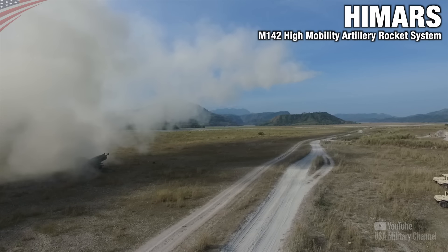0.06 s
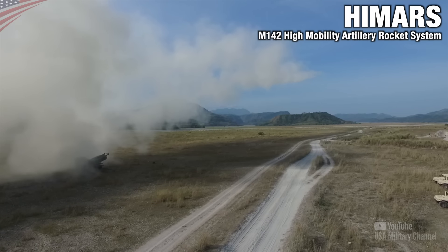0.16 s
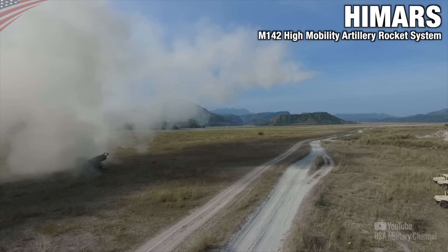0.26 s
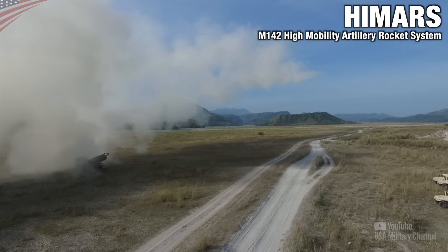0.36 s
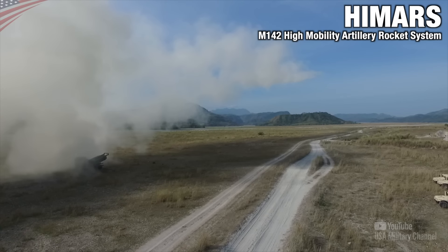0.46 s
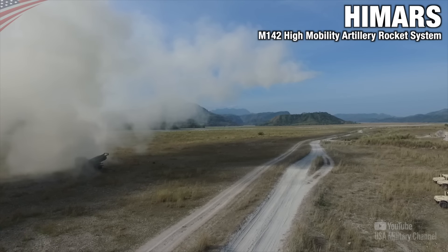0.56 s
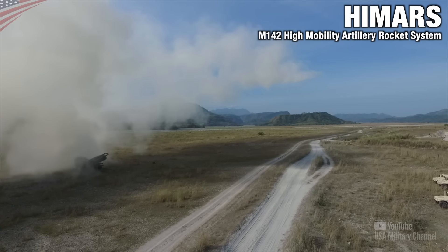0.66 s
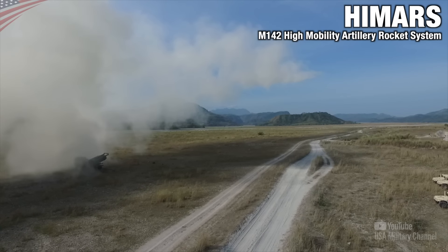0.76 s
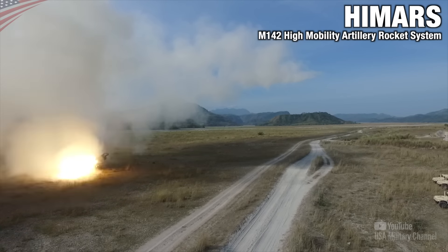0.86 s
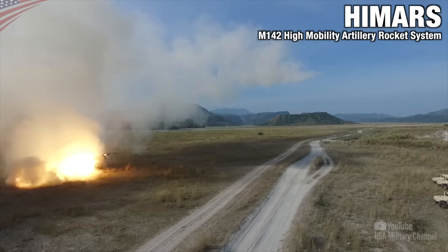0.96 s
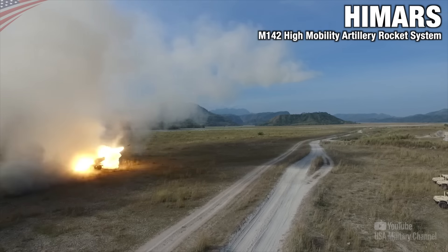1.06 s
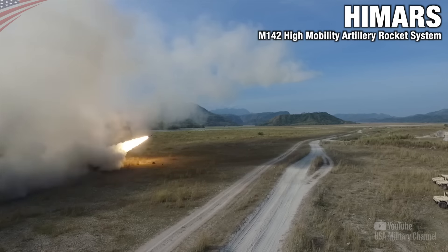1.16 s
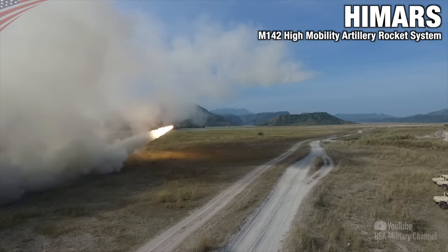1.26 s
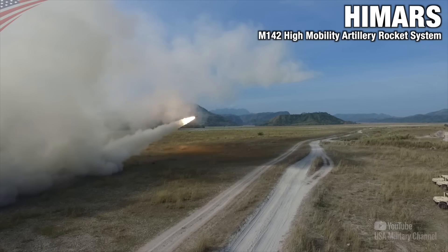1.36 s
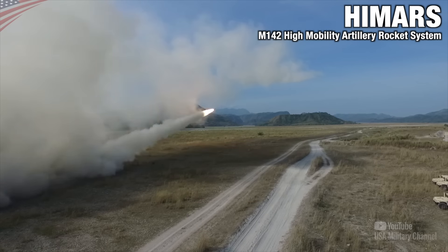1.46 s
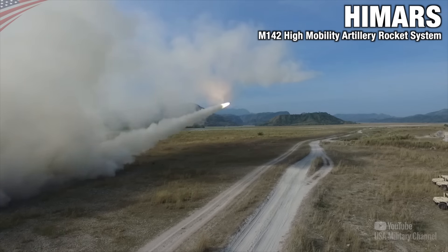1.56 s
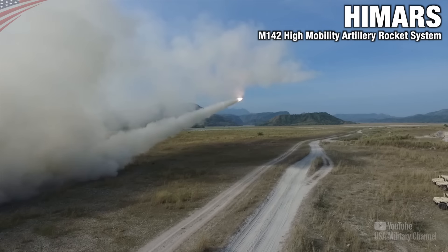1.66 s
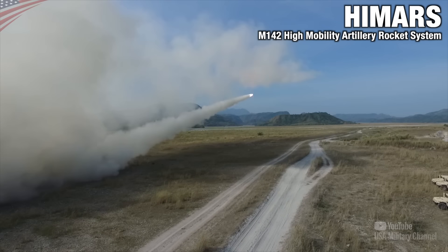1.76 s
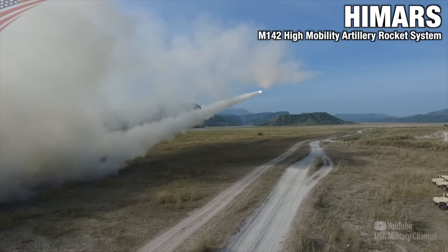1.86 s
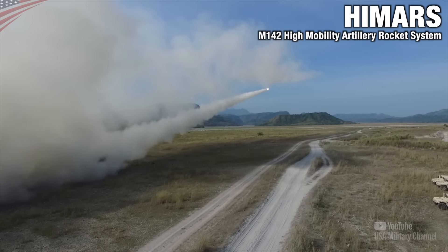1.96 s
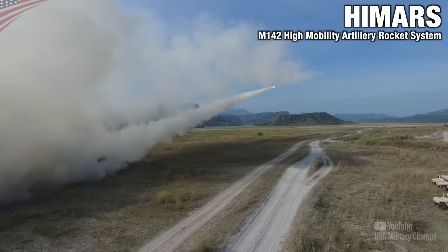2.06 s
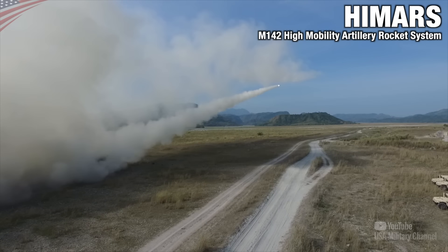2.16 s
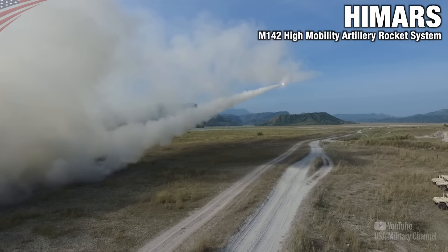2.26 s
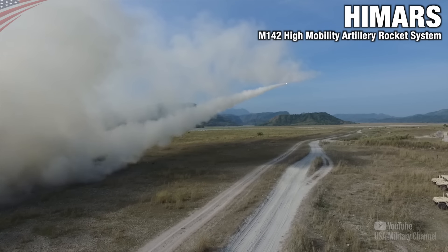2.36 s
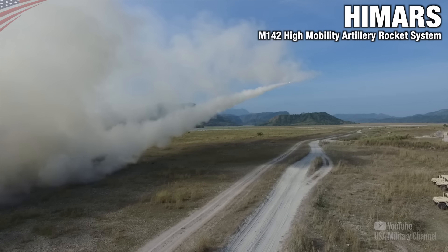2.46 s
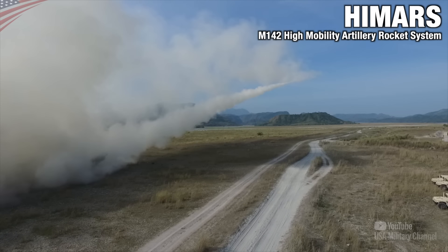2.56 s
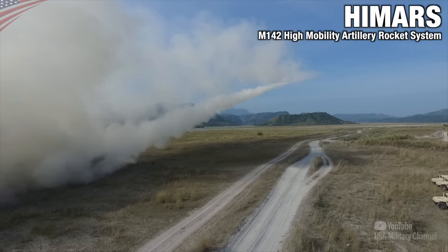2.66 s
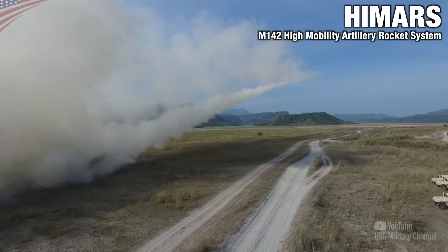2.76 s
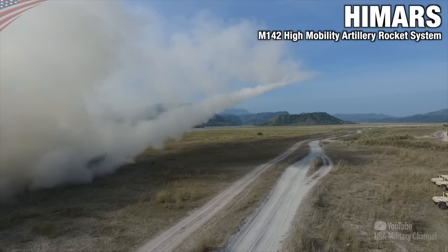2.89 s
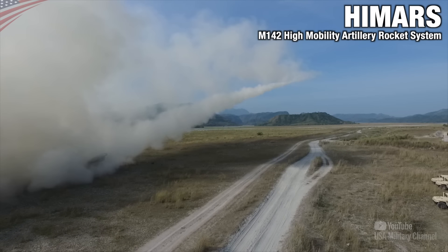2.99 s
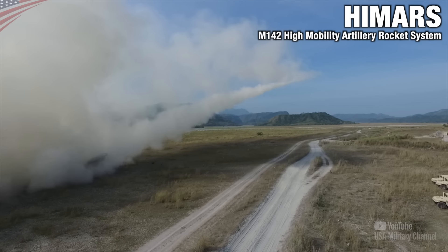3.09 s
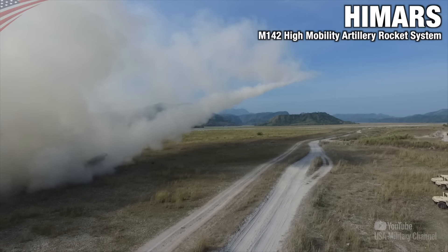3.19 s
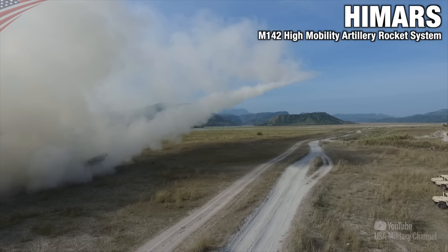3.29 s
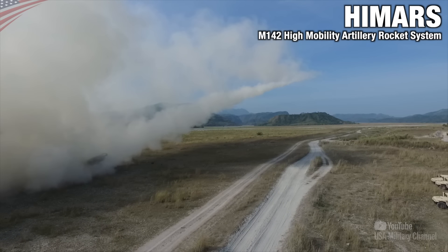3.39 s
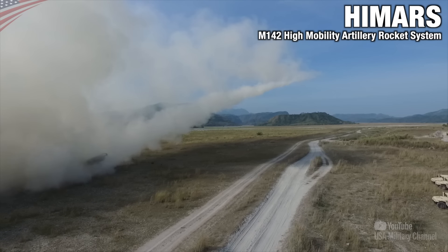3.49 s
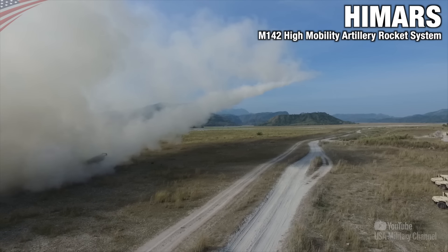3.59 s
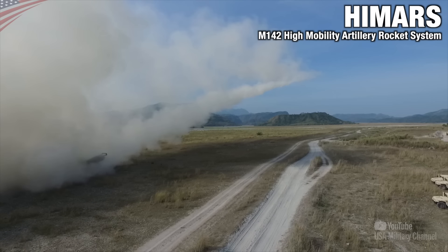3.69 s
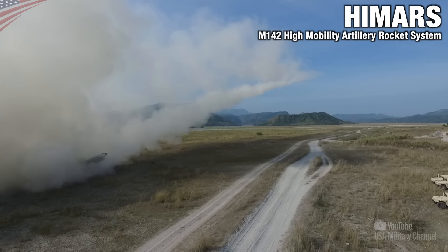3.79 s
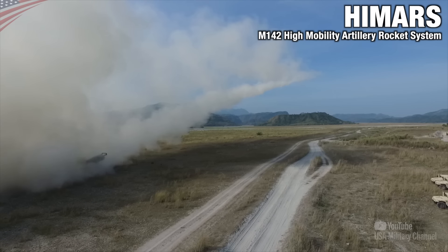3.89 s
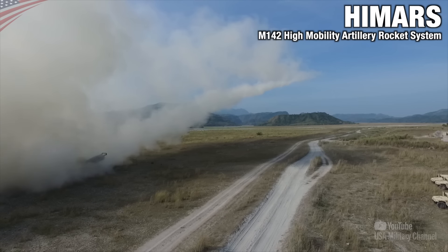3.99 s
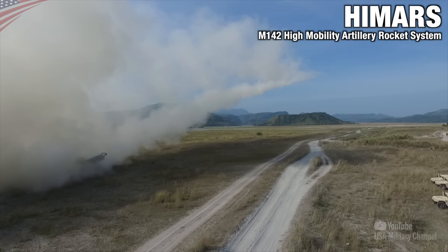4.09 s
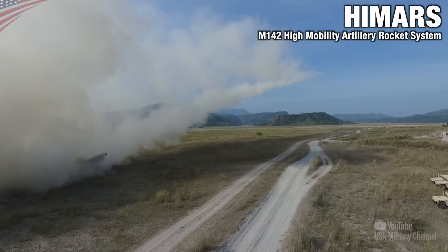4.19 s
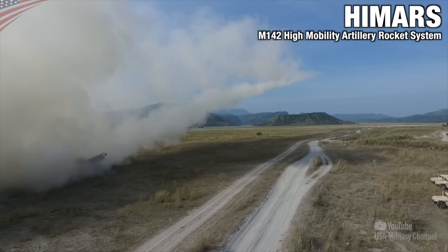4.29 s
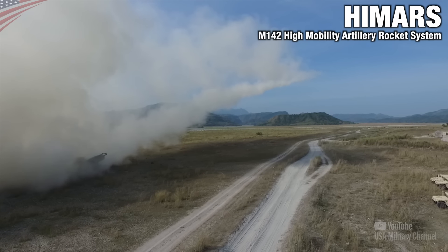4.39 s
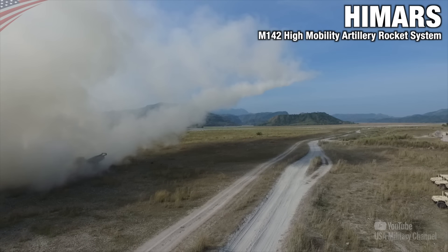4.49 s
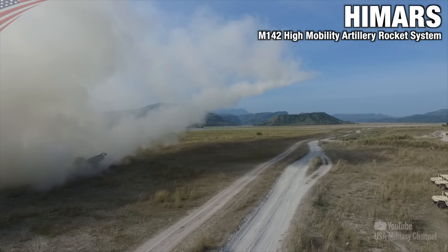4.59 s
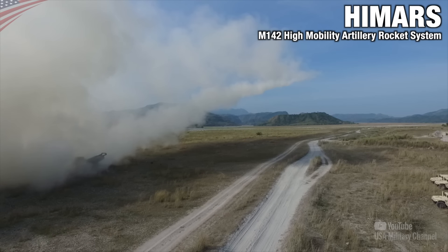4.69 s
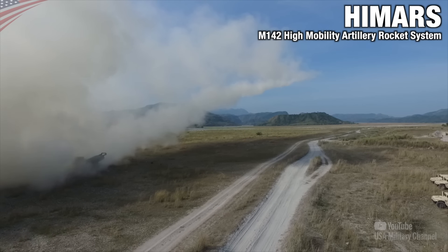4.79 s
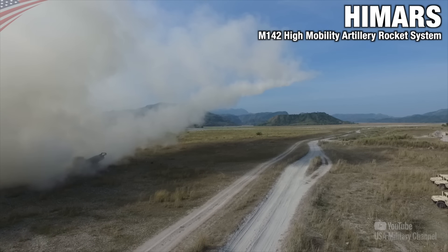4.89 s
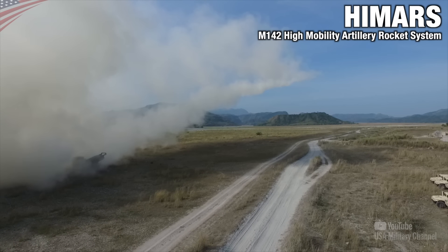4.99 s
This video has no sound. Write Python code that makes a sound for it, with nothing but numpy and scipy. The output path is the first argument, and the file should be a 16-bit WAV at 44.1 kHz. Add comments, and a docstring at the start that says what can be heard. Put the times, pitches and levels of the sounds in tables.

```python
"""An open range: a truck-mounted launcher fires a rocket, heard by one microphone feeding both channels.
A blast wave, a booming tube and jet noise in three layers overload the input into flat-topped rasping.
The roar sinks in pitch as the nozzle turns toward the listener, then surges, crackles and rumbles away
as the rocket speeds downrange; pressure pulses add sharp ticks and two dull thuds. The terrain scatters
the jet, far slopes return the launch as swells of coloured noise, and vehicles idle as wash and tones."""
import sys
import numpy as np
from scipy import signal
from scipy.fft import rfft, irfft
from scipy.io import wavfile
from scipy.ndimage import uniform_filter1d

SR = 44100
rng = np.random.default_rng(int(sys.argv[2]) if len(sys.argv) > 2 else 0)


def wrap_up_sound(samples):
    """Save the sound to the file named by the first command line argument, as 16-bit audio."""
    columns = np.atleast_2d(samples).T
    # keep every value between -1 and 1, then stretch to whole-number steps
    tamed = np.clip(columns, -1, 1)
    steps = np.round(tamed * 32767).astype(np.int16)
    wavfile.write(sys.argv[1], SR, steps)


N = 222502
TIME = np.arange(N) / SR

# when the listener hears the motor light, the rocket clear the tube, and the motor burn out
IGNITION_S, EXIT_S, BURNOUT_S = 1.1226, 1.263, 4.104


def jet(smooth_share=0.85, flutter_db=0.07, rasp_flutter_db=0.98, young_share=0.1, build_s=0.46):
    """Turbulent exhaust: deep rumble, a moving hump of roar, and crackling rasp dulled by the air."""
    # relative spectra of rumble and rasp: f/Hz, level/dB per Hz
    rumble_points = [(20, -19.5), (40, -16.5), (60, -4), (95, 0.5), (165, 0.5), (215, -7.5), (300, -8.5),
                     (420, -17.5), (1000, -24.5), (4000, -90.5)]
    rasp_points = [(200, -10), (800, 0), (1300, -4), (1900, -3), (2700, -6.5), (4000, -6.5), (6000, -10),
                   (9000, -16), (15000, -21.5)]
    # each layer's fading: level near the launcher/dB, loss on the way/dB per m,
    # level scattered by the terrain/dB, drop at burn-out/dB
    rumble_law = (-5.5, 0.07, -14.5, 14)
    roar_law = (-1.34, 0.0846, -22, 15.5)
    rasp_law = (-8.5, 0.1023, -29.5, 4.5)

    _, _, roar_aspect_db, rasp_aspect_db = aspect(TIME)
    rasp_surge_db, body_surge_db = surges()
    rumble_db = receding(*rumble_law) + body_surge_db
    roar_db = receding(*roar_law) + roar_aspect_db + body_surge_db
    rasp_db = receding(*rasp_law) + rasp_aspect_db + rasp_surge_db

    eddies, mixing, hiss = rng.standard_normal((3, N))
    jumps = crackle(per_s=500, spread_db=3.5)
    fronts = np.sqrt(smooth_share) * hiss + np.sqrt(1 - smooth_share) * jumps

    def rumble_shape(hz, t):
        return read(rumble_points, hz) * ground(hz)

    def roar_shape(hz, t):
        return roar_spectrum(hz, t) * ground(hz)

    def rasp_shape(hz, t):
        return read(rasp_points, hz) * ground(hz) * air(hz, t)

    rumble = colour(eddies, rumble_shape, size=2048, patchy_db=2)
    roar = colour(mixing, roar_shape, size=1024, patchy_db=1.5)
    rasp = colour(fronts, rasp_shape, size=512, patchy_db=1.5)

    # the largest eddies take a moment to build up behind the rocket
    rumble *= young_share + (1 - young_share) * grown(TIME, build_s)
    # uneven air makes the sound flutter, the treble most
    flutter = gain_of(flutter_db * drift(rate_hz=55))
    rasp *= gain_of(rasp_flutter_db * drift(rate_hz=51))
    upper_layers = gain_of(roar_db) * roar + gain_of(rasp_db) * rasp
    return (gain_of(rumble_db) * rumble + flutter * upper_layers) * (TIME >= IGNITION_S)


def crackle(per_s, spread_db):
    """A random train of steep pressure jumps, a few far larger than the rest."""
    size = gain_of(spread_db * np.minimum(rng.exponential(1, N), 4))
    return evened(size * (rng.random(N) < per_s / SR))


def roar_spectrum(hz, t):
    """One hump that sinks and narrows as the nozzle turns toward the listener."""
    # hump before widening: multiple of the peak frequency, level/dB per Hz
    hump_points = [(.15, -22.5), (.5, -10.5), (.8, -3), (1, 0), (1.45, -6), (2, -9), (2.8, -20.5),
                   (6, -32.5), (20, -83.5)]
    peak_hz, width, _, _ = aspect(t)
    return read(hump_points, (hz / peak_hz) ** (1 / width))


def aspect(t, turn_s=0.24):
    """The jet's peak, width, roar and rasp: first in the tube, then turning from side-on to tail-on."""
    # three views of the jet: peak f/Hz, width as a factor on the hump's octaves,
    # roar level offset/dB, rasp level offset/dB
    in_tube = (543, 1.55, -8.5, 1)
    side_on = (958, 1.45, -5, 1.5)
    tail_on = (400, 1.08, 0, 0.5)
    turned = grown(t, turn_s)
    return [np.where(t < EXIT_S, inside, side + (tail - side) * turned)
            for inside, side, tail in zip(in_tube, side_on, tail_on)]


def surges():
    """Brief flat-topped swells in dB of the rasp and the jet's low body, as uneven air focuses the jet."""
    # swells: middle t/s, half length/s, rise of the rasp/dB, rise of roar and rumble/dB
    surge_rows = [(2.116, 0.066, 2.5, 1.5), (2.303, 0.037, 3, 2), (2.58, .08, 0, 2), (2.677, .055, 7.5, 2),
                  (2.775, 0.042, 1.5, 4.5), (2.875, 0.053, 10, 1.5), (2.963, 0.033, 1, 3.5),
                  (3.052, 0.071, 6, 4), (3.184, 0.075, 5.5, 0.5), (3.57, .06, 2, .5)]
    middle_s, half_s, rasp_db, body_db = np.transpose(surge_rows)
    swells = np.exp(-((TIME[:, None] - middle_s) / half_s) ** 4)
    return swells @ rasp_db, swells @ body_db


def receding(near_db, loss_db_per_m, scatter_db, burnout_db):
    """A layer's level in dB: direct sound fades with range, scattered sound lingers, both drop at burn-out."""
    near_m, tail_off_s = 85.6, 0.45
    gather_s, scatter_fade_db_per_s = 2.04, 4  # scattered sound gathers slowly and dies slowly
    range_m = flown_m(TIME)
    direct = gain_of(near_db - loss_db_per_m * range_m) / (1 + range_m / near_m)
    scattered = gain_of(scatter_db - scatter_fade_db_per_s * (TIME - EXIT_S)) * grown(TIME, gather_s)
    spent = np.clip((TIME - BURNOUT_S) / tail_off_s, 0, 1)
    return 20 * np.log10(np.hypot(direct, scattered)) - burnout_db * spent


def flown_m(t, acceleration_m_per_s2=203.7, sound_m_per_s=343):
    """How far the steadily accelerating rocket had flown when it made the sound heard at t."""
    age_s = np.maximum(t - EXIT_S, 0)
    sonic_s = sound_m_per_s / acceleration_m_per_s2  # time to reach the speed of sound
    flight_s = sonic_s * (np.sqrt(1 + 2 * age_s / sonic_s) - 1)
    return 0.5 * acceleration_m_per_s2 * flight_s ** 2


def grown(t, half_s):
    """An S-curve from 0 to 1, half way up half_s after the rocket clears the tube."""
    u = (np.maximum(t - EXIT_S, 0) / half_s) ** 4
    return u / (1 + u)


def air(hz, t, db_per_m=0.038, clearing_share=0.22):
    """The farther the burning rocket, the more treble the air absorbs; surges come through brighter."""
    clearing_db = clearing_share * np.interp(t, TIME, surges()[0])
    loss_db = db_per_m * flown_m(np.minimum(t, BURNOUT_S)) - clearing_db  # at 5 kHz
    return gain_of(-np.maximum(loss_db, 0) * (hz / 5000) ** 1.5)


def ground(hz, delay_s=0.000515, share=0.08):
    """Direct sound and its ground reflection add up to a shallow comb."""
    return abs(1 + share * np.exp(-2j * np.pi * hz * delay_s))


def ignition():
    """The crack of the motor lighting, with a slow push of gas pressure."""
    crack = pressure_pulse(IGNITION_S, peak_db=4, push_s=0.00053)
    gas_push = pressure_pulse(IGNITION_S, peak_db=-22, push_s=0.8)
    return crack + gas_push


def pressure_pulse(start_s, peak_db, push_s):
    """A pulse shaped like a blast wave: an instant rise, a short push, a longer suction."""
    u = np.maximum(TIME - start_s, 0) / push_s
    return gain_of(peak_db) * (TIME >= start_s) * (1 - u) * np.exp(-u)


def tube(boom_hz=214, width_hz=66, level_db=-7.5, swell_db=1, attack_s=0.003, release_s=0.03):
    """Exhaust rushing through the launch tube excites one broad resonance, swelling toward the exit."""
    def resonance(hz, t):
        return 1 / (1 + ((hz - boom_hz) / width_hz) ** 2)

    boom = colour(rng.standard_normal(N), resonance, size=2048)
    inside_s = EXIT_S - IGNITION_S
    travel = np.clip((TIME - IGNITION_S) / inside_s, 0, 1)
    swell = envelope(IGNITION_S, attack_s, inside_s, release_s)
    return gain_of(level_db + swell_db * travel) * swell * boom


def ticks_and_thuds():
    """Brief pressure pulses: sharp ticks as the input overloads, then two dull, distant thuds."""
    # pulses: t/s, peak level before the treble loss/dB, length of the push/s
    pulse_rows = [(2.655, -7, 0.00022), (2.845, -11, 0.00028), (2.9, -1, 0.00016), (3.002, -4, 0.00028),
                  (3.034, -1, 0.00023), (3.592, -13, 0.0023), (4.136, -22, 0.00089)]
    pulses = sum(pressure_pulse(*row) for row in pulse_rows)
    hz, t, z = signal.stft(pulses, SR, nperseg=256)
    return signal.istft(z * air(hz[:, None], t), SR, nperseg=256)[1][:N]


def echo(attack_s=0.017, release_s=0.052):
    """Three seconds on, far slopes throw the launch back, smeared into a hollow rush with puffs of hiss."""
    # returns: arrival t/s, hold/s, hollow body level/dB, hiss level/dB
    return_rows = [(4.084, .11, -37, -41), (4.13, 0.015, -29, -55), (4.232, 0.11, -33.5, -43),
                   (4.41, .07, -40, -58), (4.477, .03, -47, -45)]
    # relative spectra of body and hiss: f/Hz, level/dB per Hz
    body_points = [(150, -14), (380, -3), (630, 5), (820, -3.5), (1100, -13), (1400, -18), (2200, -32),
                   (5000, -69)]
    hiss_points = [(600, -17), (1300, 0.5), (1900, 4.5), (2700, -8.5), (3600, -3), (4400, -11.5),
                   (6000, -22), (9000, -50)]
    body_power, hiss_power = np.zeros((2, N))
    for arrival_s, hold_s, body_db, hiss_db in return_rows:
        swell = envelope(arrival_s, attack_s, hold_s, release_s)
        body_power += (gain_of(body_db) * swell) ** 2
        hiss_power += (gain_of(hiss_db) * swell) ** 2
    body = colour(rng.standard_normal(N), lambda hz, t: read(body_points, hz), size=1024, patchy_db=2.5)
    hiss = colour(rng.standard_normal(N), lambda hz, t: read(hiss_points, hz), size=512, patchy_db=3.5)
    return np.sqrt(body_power) * body + np.sqrt(hiss_power) * hiss


def idling(wash_db=-56, waver_hz=5, hum_trim_db=-3):
    """A low wash of engines, made of coloured noise, with two wavering tones."""
    # relative spectrum of the wash: f/Hz, level/dB per Hz
    wash_points = [(15, -51), (25, -22), (75, -5), (158, -0.5), (196, -8.5), (264, -4.5), (344, -13),
                   (383, -9.5), (488, -15), (621, -13), (729, -15.5), (1960, -18), (2300, -22.5),
                   (15000, -46.5)]
    # the tones: f/Hz, rms level before the trim/dB
    tone_rows = [(166.9, -71), (387.6, -69)]
    wash = colour(rng.standard_normal(N), lambda hz, t: read(wash_points, hz), size=2048, patchy_db=1.5)
    hum = np.zeros(N)
    for tone_hz, tone_db in tone_rows:
        wavering_hz = tone_hz + waver_hz * drift(rate_hz=12)
        phase = 2 * np.pi * np.cumsum(wavering_hz) / SR
        hum += gain_of(tone_db) * evened(np.sin(phase))
    return gain_of(wash_db) * wash + gain_of(hum_trim_db) * hum


def gain_of(db):
    """Decibels to amplitude."""
    return 10 ** (np.asarray(db) / 20)


def evened(x):
    """Scales to rms 1."""
    return x / np.sqrt(np.mean(x ** 2) + 1e-20)


def read(points, hz):
    """A spectrum's gain, joined by straight lines in dB on a log-frequency axis."""
    f, db = np.transpose(points)
    return gain_of(np.interp(np.log(hz + 0.0013), np.log(f), db))  # the offset avoids log(0)


def drift(rate_hz):
    """Slow random wandering of rms 1: noise under a Gaussian low-pass."""
    hz = np.fft.rfftfreq(N, 1 / SR)
    return evened(irfft(rfft(rng.standard_normal(N)) * np.exp(-(hz / rate_hz) ** 2), N))


def colour(x, shape, size, patchy_db=0):
    """Filters x by a moving spectrum shape(Hz, s) with random patches, evening the filter's power."""
    overlap = size * 3 // 4
    hz, t, z = signal.stft(x, SR, nperseg=size, noverlap=overlap)
    gain = shape(hz[:, None], t) * gain_of(patchy_db * patches(z.shape, size=(3, 12)))
    gain = gain / np.sqrt(np.mean(gain ** 2, axis=0))
    return signal.istft(z * gain, SR, nperseg=size, noverlap=overlap)[1][:N]


def patches(shape, size):
    """A smooth random field of rms 1 over frequency and time."""
    field = rng.standard_normal(shape)
    for axis in (0, 1):
        for _ in range(2):
            field = uniform_filter1d(field, size[axis], axis)
    return evened(field)


def envelope(start_s, attack_s, hold_s, release_s):
    """A straight rise, a hold, an exponential release."""
    age_s = TIME - start_s
    rise = np.clip(age_s / attack_s, 0, 1)
    return rise * np.exp(-np.maximum(age_s - attack_s - hold_s, 0) / release_s)


def scene():
    """Everything reaches one microphone, which feeds both channels."""
    mono = jet() + ignition() + tube() + ticks_and_thuds() + echo() + idling()
    return np.array([mono, mono])


def record(dry, ceiling_db=-9.5, edge_hz=15400):
    """The input stage overloads into hard flat tops; then the treble is cut off above edge_hz."""
    fine = signal.resample_poly(dry, 2, 1, axis=1)  # clip at double rate to limit aliasing
    flat = np.clip(fine, -gain_of(ceiling_db), gain_of(ceiling_db))
    clipped = signal.resample_poly(flat, 1, 2, axis=1)
    low_pass = signal.firwin(255, edge_hz, window=("kaiser", 9), fs=SR)
    return signal.oaconvolve(clipped, low_pass[None], "same")


dry = scene()
out = record(dry)
wrap_up_sound(out)
```